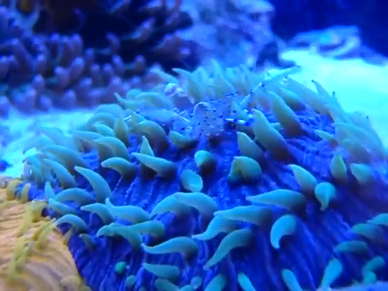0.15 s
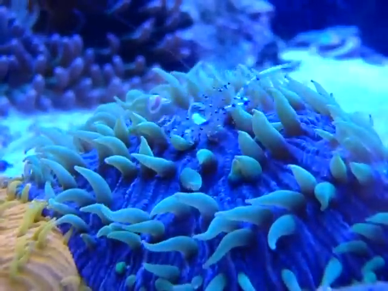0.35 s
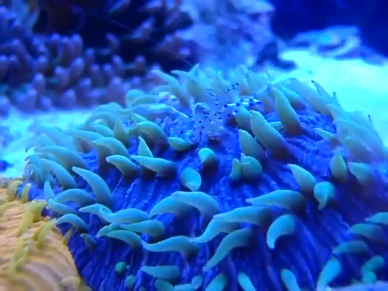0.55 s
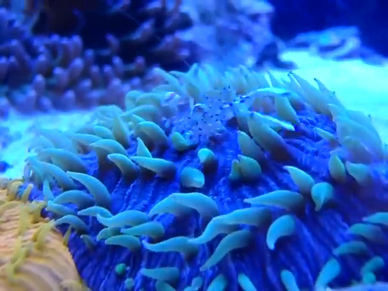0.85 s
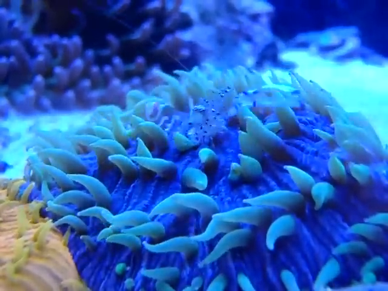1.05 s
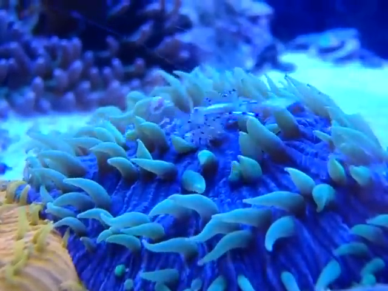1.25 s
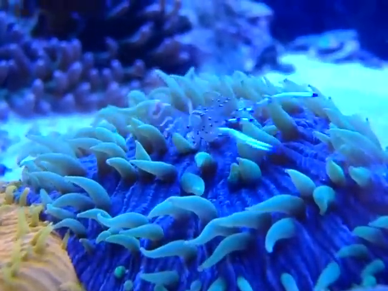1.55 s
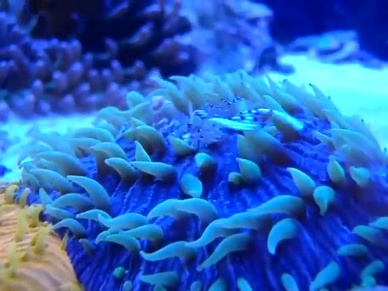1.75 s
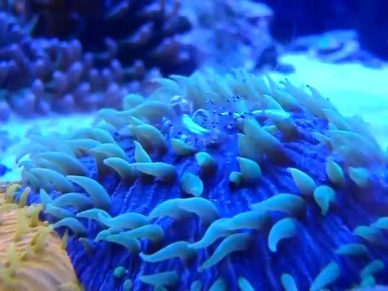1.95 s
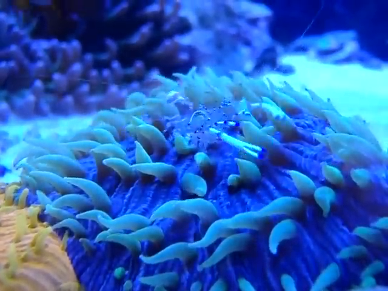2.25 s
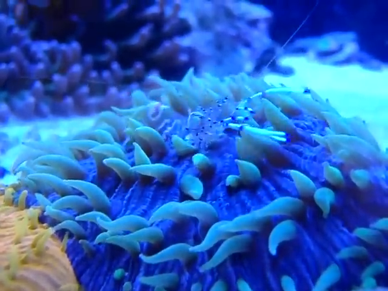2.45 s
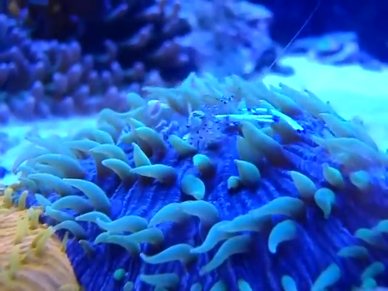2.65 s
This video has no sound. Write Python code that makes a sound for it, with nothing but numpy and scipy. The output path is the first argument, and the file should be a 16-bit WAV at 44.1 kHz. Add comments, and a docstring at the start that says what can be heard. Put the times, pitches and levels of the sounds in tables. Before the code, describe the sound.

A fish tank pump hums low and continuously, abruptly growing stronger early on; beneath it water rumbles, while faint bright trickling, popping bubbles and occasional soft bumps sound close by in a quiet room.

```python
"""In a quiet room, an aquarium pump hums on multiples of the mains frequency, with a few stray tones.
Early on the hum abruptly changes, its fourth multiple growing stronger; brief dips and swells come before and after.
Moving water makes low noise and rings the tank close to that tone, so the two beat unevenly.
Filtered noise makes a patchy hiss, bright splashes and bursting bubbles; random clicks make fine spray.
Now and then a few cycles of a damped low sine make a soft bump."""
import sys
import numpy as np
from scipy import signal
from scipy.fft import rfft, irfft, next_fast_len
from scipy.io import wavfile
from scipy.ndimage import uniform_filter1d, map_coordinates

SR = 44100
rng = np.random.default_rng(int(sys.argv[2]) if len(sys.argv) > 2 else 0)


def dump(signal):
    """Clip the signal to [-1, 1] and save it as 16-bit WAV at the path in sys.argv[1]."""
    limited = np.clip(np.atleast_2d(signal).T, -1, 1)
    pcm = np.round(limited * 32767).astype(np.int16)
    wavfile.write(sys.argv[1], SR, pcm)


N = 123479  # length of the scene [samples]


def amp(db):
    """Turn decibels into a gain."""
    return 10 ** (np.asarray(db) / 20)


def unit(x):
    """Scale a sound to an average (rms) level of 1."""
    return x / np.sqrt(np.mean(x ** 2) + 1e-20)


def wobble(knots_per_s):
    """A smooth curve through random knots."""
    knots = rng.standard_normal(400)
    position = np.arange(N) * knots_per_s / SR
    return map_coordinates(knots, [position], mode="wrap")


def filtered(x, response):
    """Multiply each frequency in a sound by a response."""
    size = next_fast_len(len(x) + 8192)  # spare room for the filter to ring out
    spectrum = rfft(x, size) * response(np.fft.rfftfreq(size, 1 / SR))
    return irfft(spectrum, size)[:len(x)]


def coloured(x, points):
    """Shape a sound by a (frequency [Hz], level [dB]) curve, then scale it to rms 1."""
    curve_hz, curve_db = np.transpose(points)

    def response(hz):
        """Read the curve on a logarithmic frequency scale."""
        return amp(np.interp(np.log(hz + 1), np.log(curve_hz), curve_db))

    return unit(filtered(x, response))


def resonance(x, hz, width_hz):
    """Ring a sound at one frequency; two equal resonances in a row give steep sides."""
    def response(f):
        """Two passes, each with the given width."""
        return (1j * f * width_hz / (hz * hz - f * f + 1j * f * width_hz)) ** 2

    return filtered(x, response)


def add(track, start_s, sound):
    """Mix a sound into a track at its start time."""
    part = track[max(round(start_s * SR), 0):][:len(sound)]
    part += sound[:len(part)]


def room(x):
    """A short diffuse echo: fading noise stands for many mixed reflections."""
    t60_s = 0.46  # time to fade by 60 dB
    t = np.arange(SR // 2) / SR
    tail = rng.standard_normal(len(t)) * amp(-60 * t / t60_s)
    return signal.fftconvolve(x, tail / np.linalg.norm(tail))[:N]


def wash():
    """Soft hiss of circulating water: noise whose loudness is patchy in time and frequency."""
    level_db, patchy_db = -55, 2
    # steady colour of the hiss: (frequency [Hz], level [dB])
    wash_colour = [(300, -15.5), (700, -5), (850, -2.5), (1000, 1), (1300, -8), (1650, -7), (1980, -5),
                   (2400, -15), (2750, -14.5), (3400, -17.5), (4300, -11), (5000, -11), (5700, -23.5),
                   (8000, -31), (13000, -41.5)]
    noise = signal.stft(rng.standard_normal(N), nperseg=512)[2]
    patches = uniform_filter1d(rng.standard_normal(noise.shape), size=5, axis=0)  # across frequency
    patches = uniform_filter1d(patches, size=8, axis=1)  # across time
    patchy = signal.istft(noise * amp(patchy_db * unit(patches)), nperseg=512)[1][:N]
    return amp(level_db) * coloured(patchy, wash_colour)


def spray():
    """Loose clumps of fine droplets: random clicks of uneven loudness, coloured bright."""
    drops_per_s, level_db = 450, -64.5  # average rate, rms level
    spread_db, clump_db = 17.5, 2  # range of drop levels, strength of the clumping
    # colour of the droplets: (frequency [Hz], level [dB])
    spray_colour = [(1500, -41), (3500, -25), (4200, 5.5), (5000, 3.5), (5600, -16), (8000, -30),
                    (14000, -44)]
    drops = (rng.random(N) < drops_per_s / SR) * np.sign(rng.standard_normal(N))
    drops *= amp(spread_db * rng.random(N) + clump_db * wobble(23))
    return amp(level_db) * coloured(drops, spray_colour)


def burst(hz, width_hz, t60_s):
    """Noise that starts suddenly and dies away rings a steep-sided band; its peak is 1."""
    t = np.arange(SR // 8) / SR
    noise = rng.standard_normal(len(t)) * amp(-60 * t / t60_s)
    ringing = resonance(noise, hz, width_hz)
    ringing = resonance(ringing, hz, width_hz)
    return ringing / np.abs(ringing).max()


def trickle():
    """Splashes and bursting bubbles, each a short burst of noise, over the fine spray."""
    # splashes: (time [s], peak level before a 3 dB cut [dB], centre frequency [Hz])
    splashes = [(0.0452,-41,4140),(.0585,-41,4430),(0.1647,-44,4430),(.212,-41.5,4550),(0.253,-43,4220),(.314,-46,4520),(0.3374,-42,4440),(.462,-39.5,4550),(0.5925,-38.5,4440),(0.61,-39.5,4540),(0.6948,-45,4280),(0.7241,-41.5,4560),(0.766,-42,4980),(0.982,-37,4490),(1.1138,-43.5,5000),(1.251,-38,4320),(1.3584,-37.5,4400),(1.375,-33.5,4500),(1.5412,-43,4470),(1.558,-41,4360),(1.749,-43,4200),(1.8084,-38,4350),(2.059,-42.5,4200),(2.2264,-40,4410),(2.238,-42,4720),(2.249,-46.5,4350),(2.375,-43.5,4320),(2.409,-44,5100),(2.533,-37.5,4340),(2.781,-44.5,4400)]
    # bursting bubbles: (time [s], peak level [dB], centre frequency [Hz])
    bubbles = [(.1945, -50.5, 6190), (0.4384, -49, 1620), (0.448, -55.5, 6400), (0.513, -63, 7400),
               (0.559, -55.5, 2740), (0.748, -59, 6320), (.928, -55.5, 2580), (1.047, -52, 1570),
               (1.289, -54.5, 5700), (1.3265, -47.5, 1600), (1.6215, -55.5, 6130), (1.667, -60, 6800),
               (1.803, -42, 955), (1.949, -61.5, 6400), (2.3117, -60.5, 6440), (2.343, -46, 1260),
               (2.345, -52, 3070), (2.4089, -64, 5960), (2.458, -58.5, 5770), (2.615, -65.5, 6600),
               (2.689, -47, 1290)]
    water = spray()
    for start_s, db, hz in splashes:
        add(water, start_s, amp(db - 3) * burst(hz, width_hz=1240, t60_s=0.048))
    for start_s, db, hz in bubbles:
        add(water, start_s, amp(db) * burst(hz, width_hz=0.22 * hz, t60_s=0.06))
    return water


def bumps():
    """Each soft bump is a few cycles of a low sine that swells quickly and dies away."""
    t60_s, attack_s = 0.055, 0.011  # time to fade by 60 dB, time constant of the swell
    # bumps: (time [s], level before the swell and fade [dB], frequency [Hz])
    bump_list = [(0.093, -9, 86.4), (0.094, -14, 175), (.18, -22, 62), (0.394, -25, 62), (.585, -34, 50),
                 (1.546, -16.5, 147.6), (1.549, -13, 75.5), (1.599, -28, 95), (2.32, -21, 110),
                 (2.629, -18, 58)]
    out = np.zeros(N)
    t = np.arange(SR // 5) / SR
    swell = 1 - np.exp(-t / attack_s)
    for start_s, db, hz in bump_list:
        fade = amp(db - 60 * t / t60_s)
        add(out, start_s, fade * swell * np.sin(2 * np.pi * hz * t))
    return out


def shifted(before, after):
    """Cross-fade quickly from the first state of the hum to the second."""
    shift_s, shift_length_s = .737, 0.0074  # middle and length of the change
    share = np.clip((np.arange(N) / SR - shift_s) / shift_length_s + .5, 0, 1)
    return before * (1 - share) + after * share


def rumble():
    """Low noise of the flow and the tank resonance it stirs; both change with the hum."""
    # colour of the flow before the change: (frequency [Hz], level [dB])
    colour_before = [(20, -15.5), (55, 1), (90, -5.5), (190, -6), (280, -2), (330, -2.5), (390, -15),
                     (470, -15.5), (750, -22.5), (1200, -30.5), (2500, -79)]
    # colour of the flow after the change: (frequency [Hz], level [dB])
    colour_after = [(20, -9), (55, -5.5), (108, -10), (150, 3), (215, -3.5), (290, -4.5), (340, -3.5),
                    (385, -8), (440, -7.5), (470, -14), (525, -11), (555, -19), (595, -8.5), (645, -12.5),
                    (700, -17.5), (1200, -31), (2500, -80)]
    noise_before, noise_after, noise_tank = rng.standard_normal((3, N))
    flow_before = amp(-35.5) * coloured(noise_before, colour_before)
    flow_after = amp(-38.5) * coloured(noise_after, colour_after)
    tank = unit(resonance(noise_tank, hz=258, width_hz=30))
    tank_gain = shifted(amp(-44), amp(-36.5))
    return shifted(flow_before, flow_after) + tank_gain * tank


def sway():
    """Gain of the hum through its brief dips and swells, each a smooth bell-shaped curve."""
    width_s = 0.0091  # standard deviation of each bell
    # dips (negative) and swells (positive): (time [s], level [dB])
    sways = [(0.038, 5.5), (.058, -6), (0.083, 6.5), (.82, 2), (.865, -4), (1.31, -8), (1.342, 1.5),
             (1.38, -11), (1.55, -3), (1.7, -3.5), (1.785, -6), (1.94, 4), (1.965, -8), (1.99, 6),
             (2.13, 3.5), (2.53, -3.5), (2.61, 2)]
    t = np.arange(N) / SR
    level_db = np.zeros(N)
    for centre_s, db in sways:
        level_db += db * np.exp(-.5 * ((t - centre_s) / width_s) ** 2)
    return amp(level_db)


def pump():
    """Motor hum: sine tones, mostly on mains multiples, that waver slightly in level and phase."""
    mains_hz = 60.03
    waver_db, waver_rad, waver_per_s = 0.25, 0.042, 5.4  # level, phase, random knots a second
    # levels here are rms, without the dips and swells
    # hum: (multiple of the mains, level before the change [dB], level after it [dB])
    hum = [(1, -56.5, -54.5), (2, -39.5, -45), (4, -31, -23.5), (5, -87.5, -55.5), (6, -40, -55),
           (7, -46.5, -51), (8, -54, -58), (10, -60.5, -50.5), (11, -69, -65), (12, -61.5, -63.5),
           (14, -73.5, -78.5)]
    # tones off the mains series: (frequency [Hz], level before the change [dB], level after it [dB])
    whine = [(150.2, -52, -50.5), (196.2, -60, -49), (1323.5, -72.5, -73), (1355, -76, -71.5),
             (1965.6, -77, -76)]
    tones = [(round(multiple) * mains_hz, before, after) for multiple, before, after in hum]
    tones += list(whine)
    t = np.arange(N) / SR
    out = np.zeros(N)
    for hz, before_db, after_db in tones:
        phase = 2 * np.pi * (hz * t + rng.random()) + waver_rad * wobble(waver_per_s)
        level = shifted(amp(before_db), amp(after_db)) * amp(waver_db * wobble(waver_per_s))
        out += level * np.sqrt(2) * np.sin(phase)  # a sine of peak sqrt(2) has rms 1
    return out


def scene():
    """Pump and water together, in mono; only the trickle gets the room echo."""
    water = trickle()
    echo = amp(-5) * room(water)
    hum = pump() * sway()
    mix = hum + rumble() + wash() + bumps() + water + echo
    return mix[None]


def record(dry):
    """The recorder's band limit: a steep low-pass filter that removes the highest treble."""
    top_hz = 14170
    low_pass = signal.ellip(12, .1, 90, top_hz, fs=SR, output="sos")  # .1 dB ripple, 90 dB cut
    return signal.sosfilt(low_pass, dry)


dry = scene()
out = record(dry)
dump(out)
```